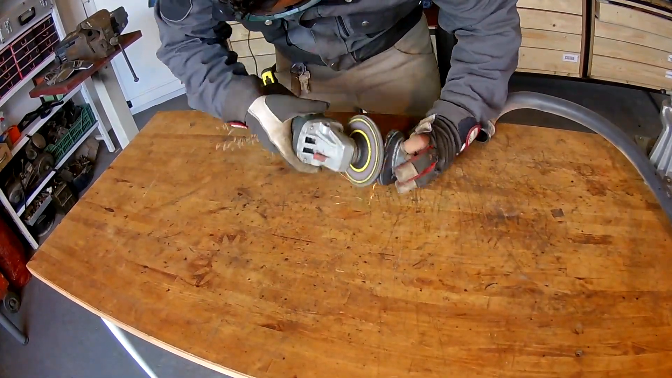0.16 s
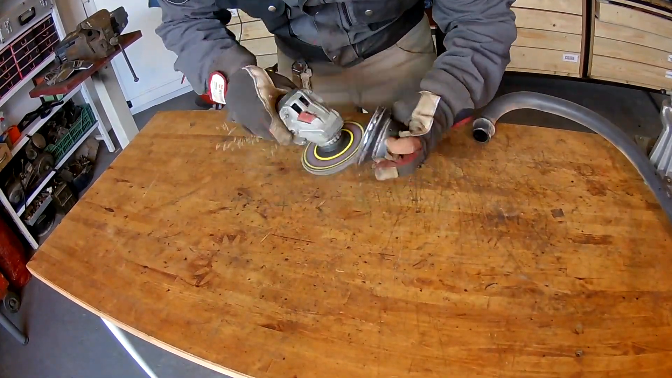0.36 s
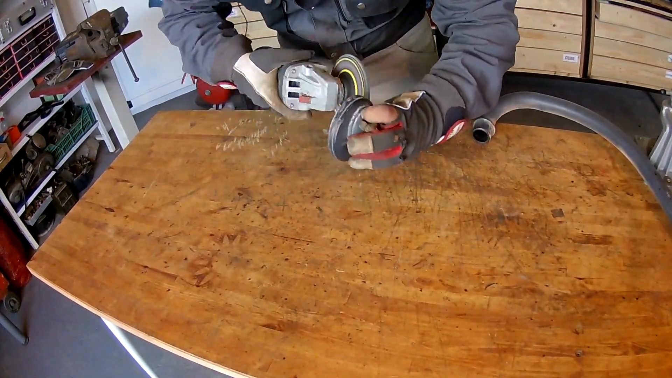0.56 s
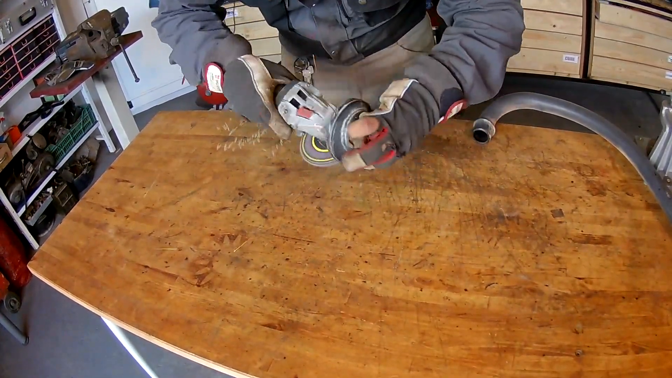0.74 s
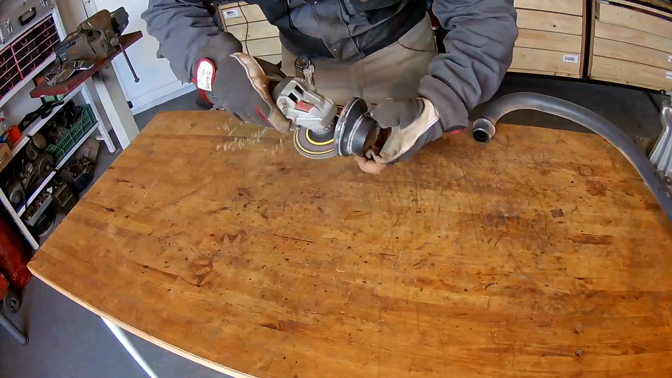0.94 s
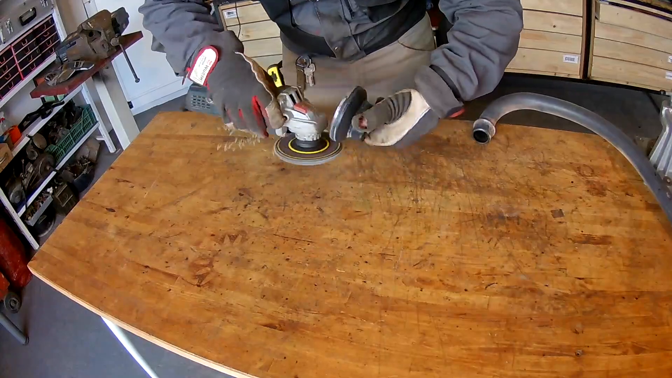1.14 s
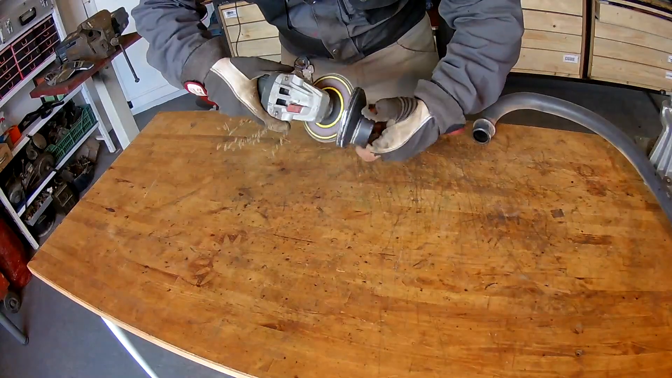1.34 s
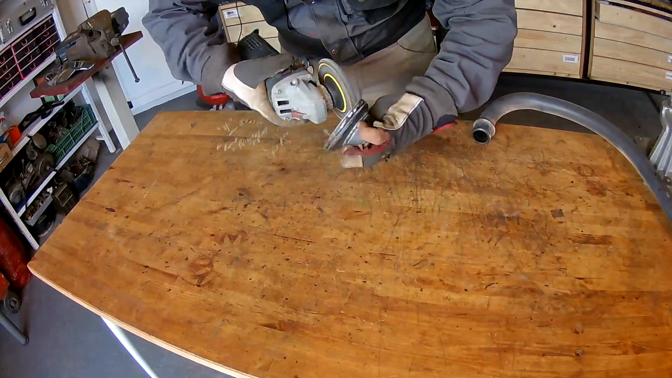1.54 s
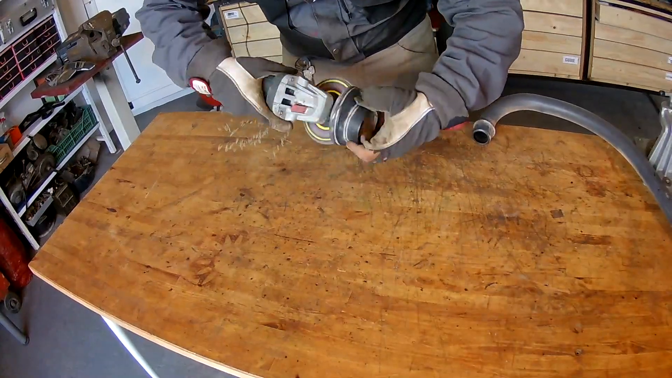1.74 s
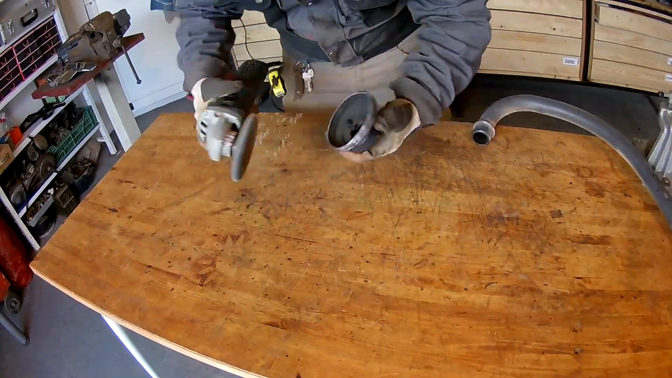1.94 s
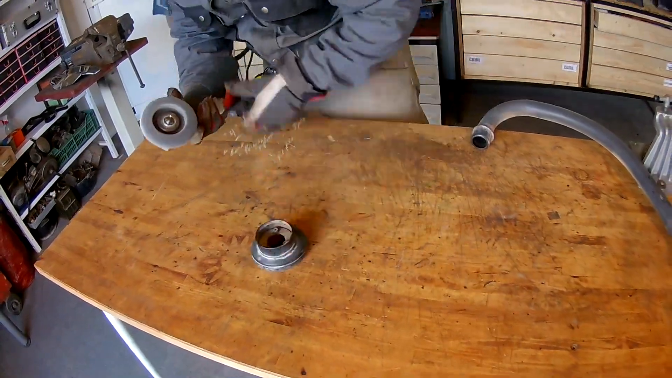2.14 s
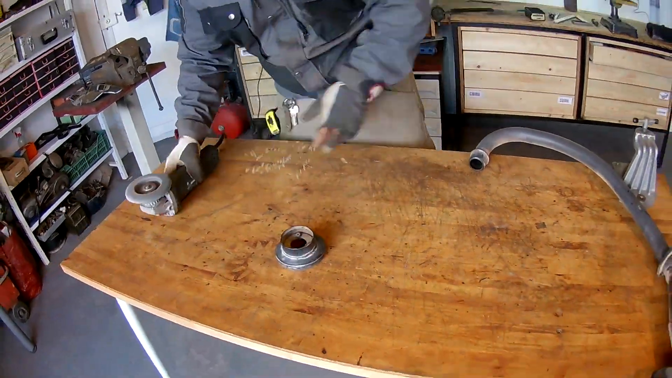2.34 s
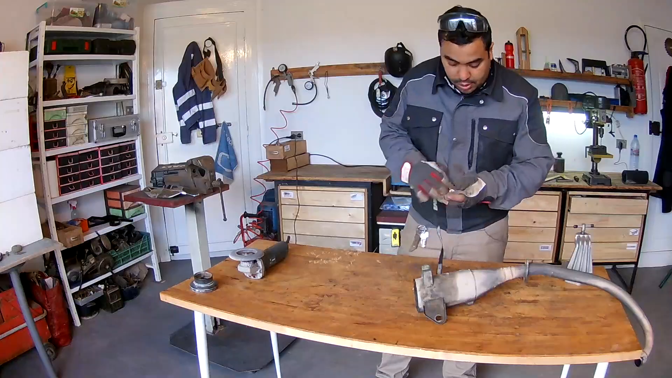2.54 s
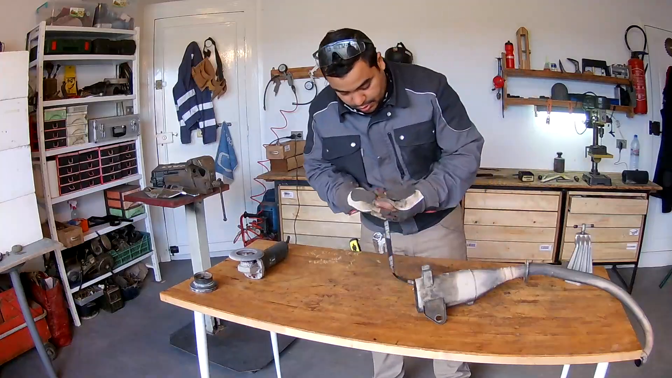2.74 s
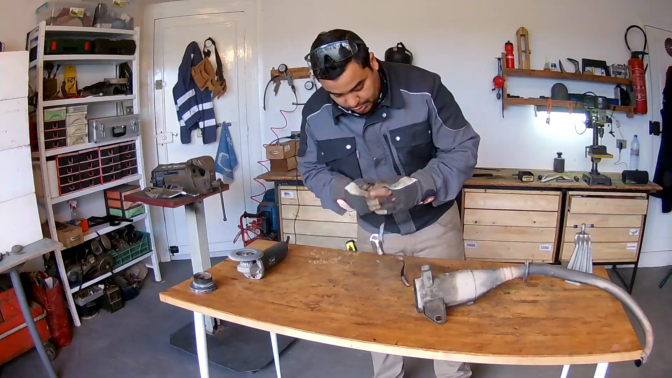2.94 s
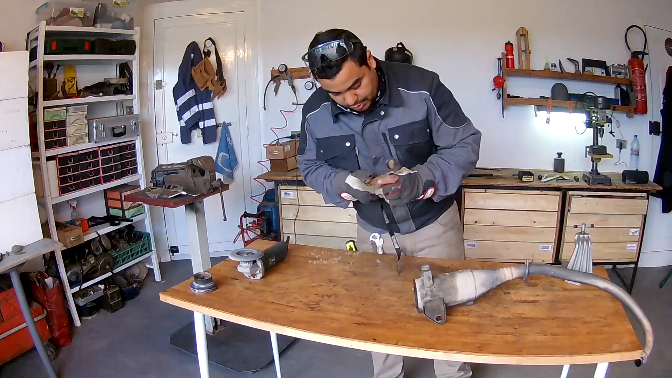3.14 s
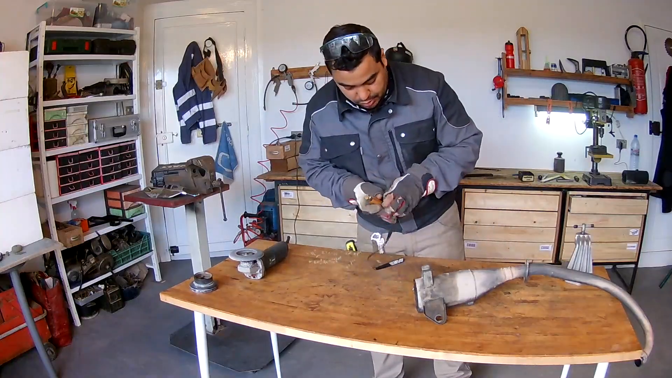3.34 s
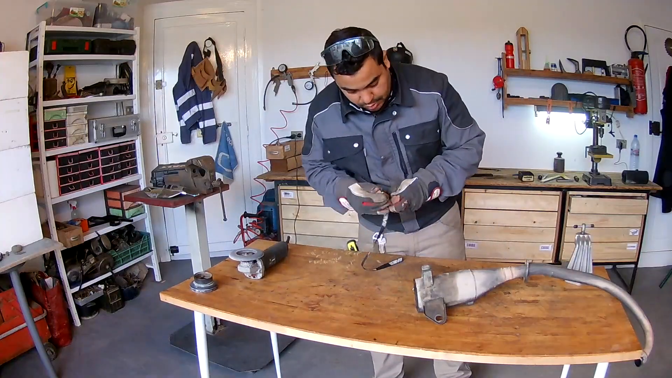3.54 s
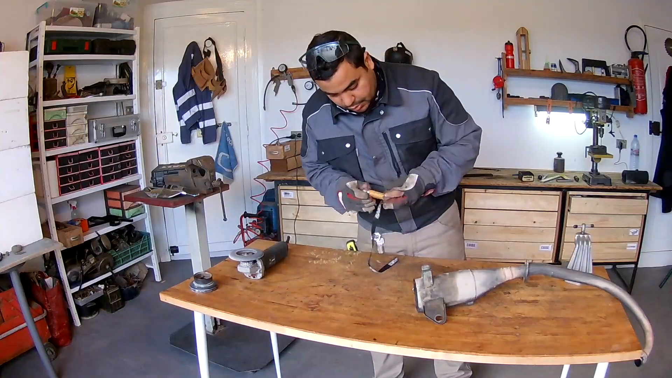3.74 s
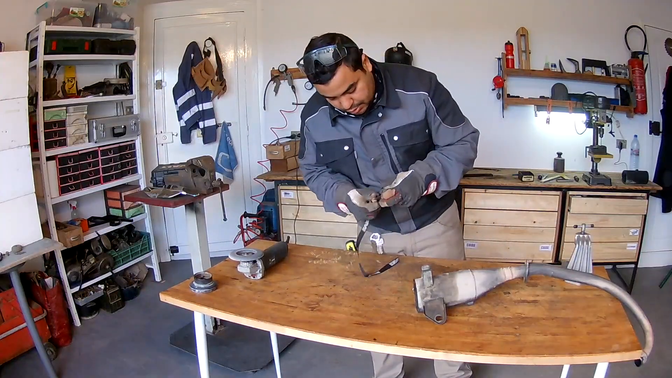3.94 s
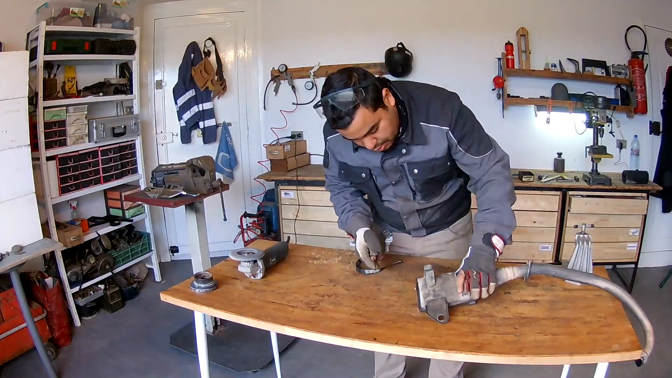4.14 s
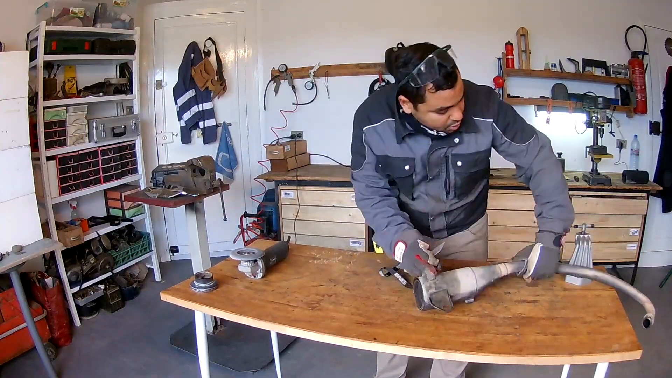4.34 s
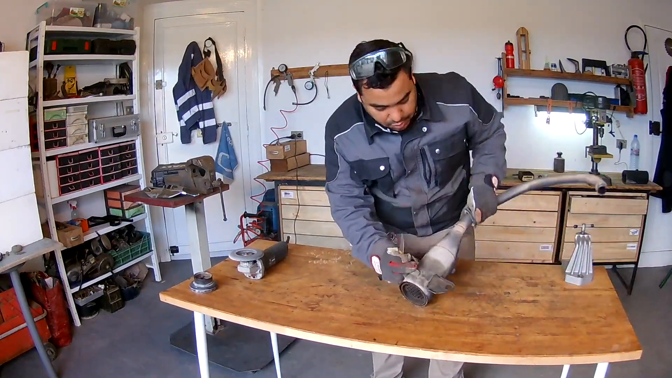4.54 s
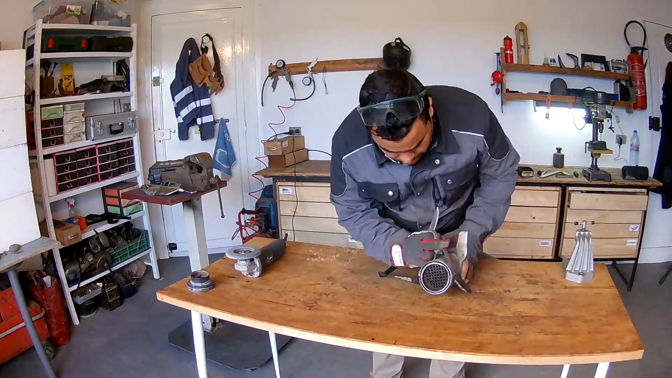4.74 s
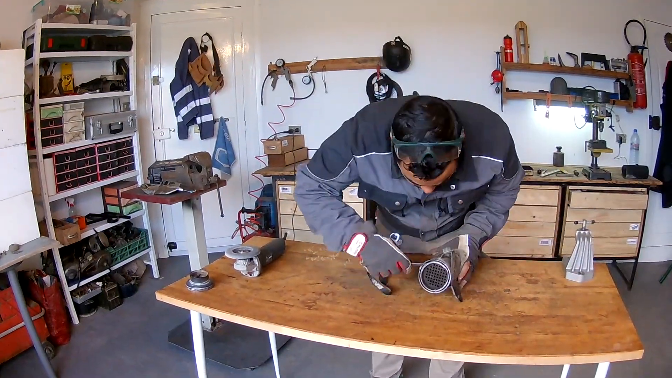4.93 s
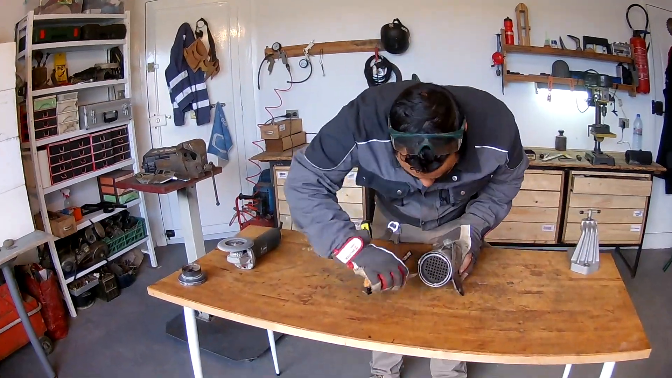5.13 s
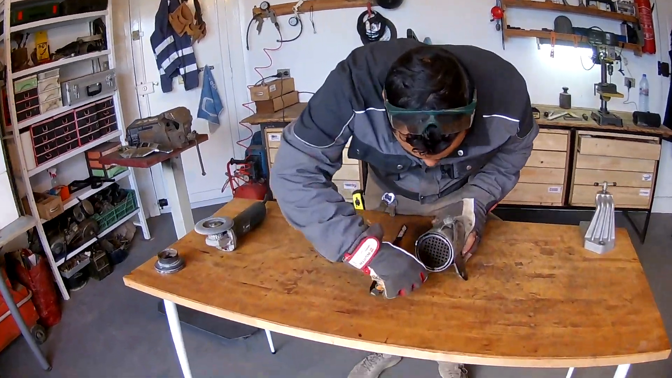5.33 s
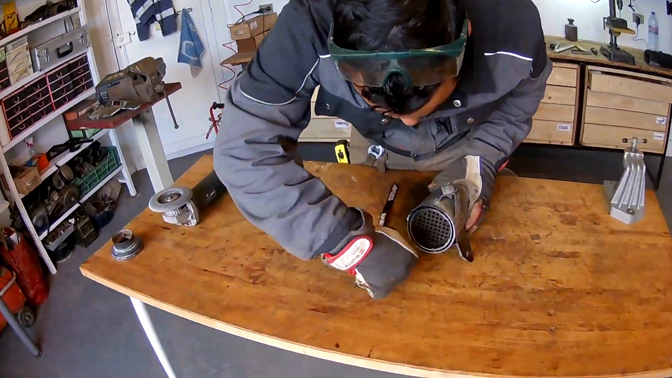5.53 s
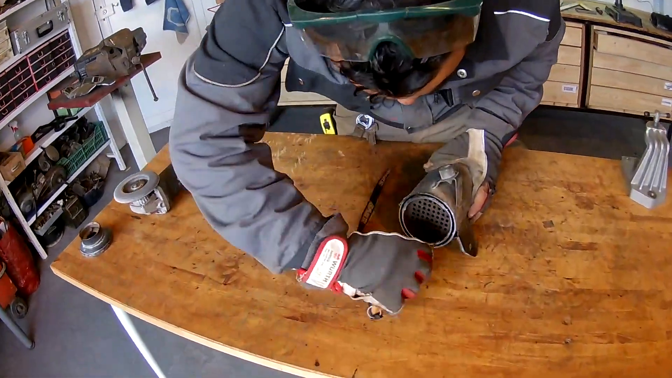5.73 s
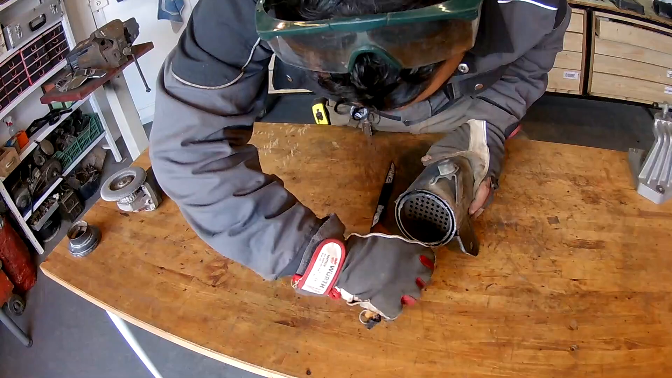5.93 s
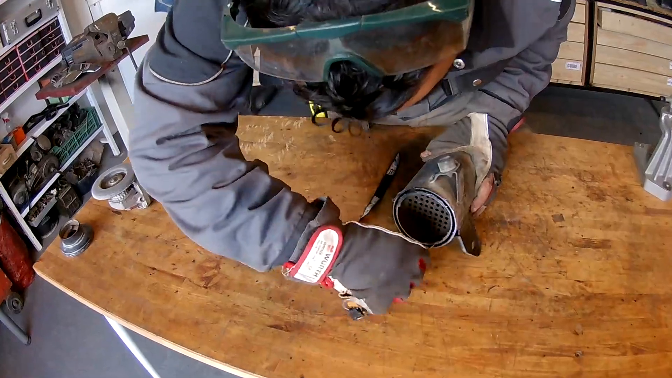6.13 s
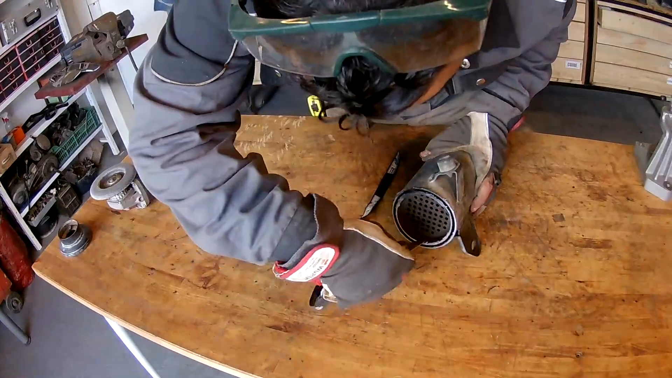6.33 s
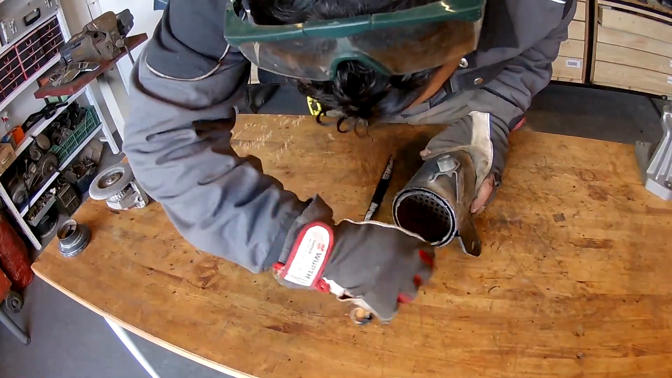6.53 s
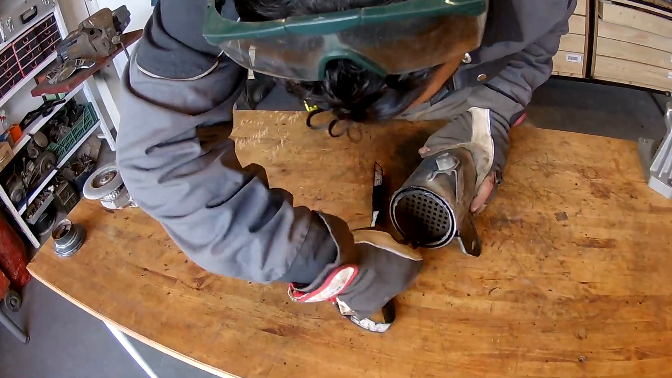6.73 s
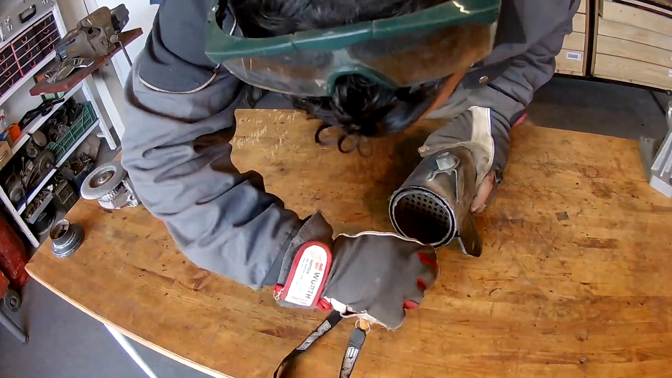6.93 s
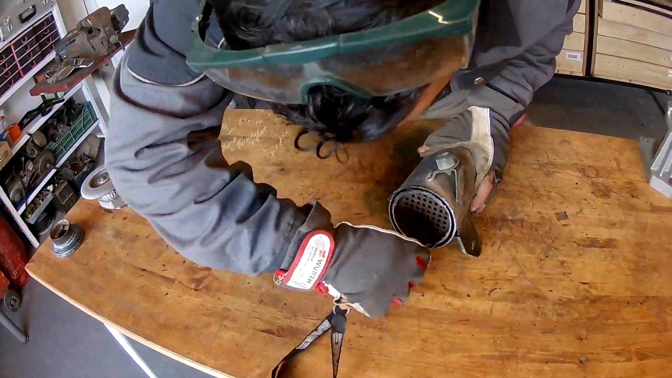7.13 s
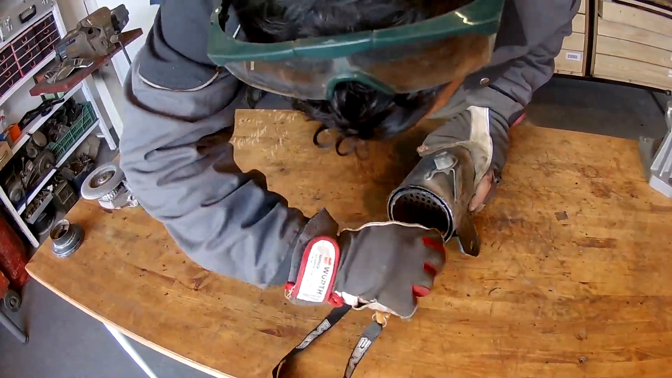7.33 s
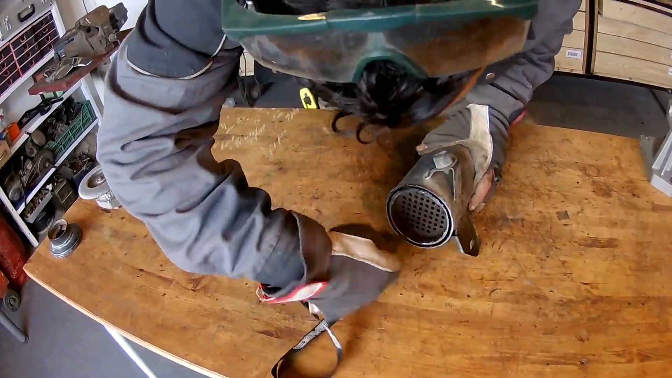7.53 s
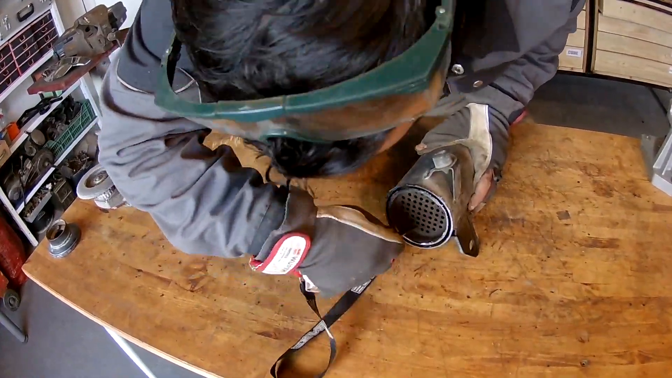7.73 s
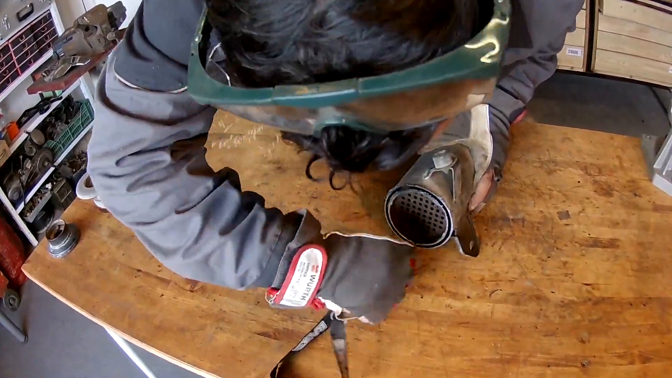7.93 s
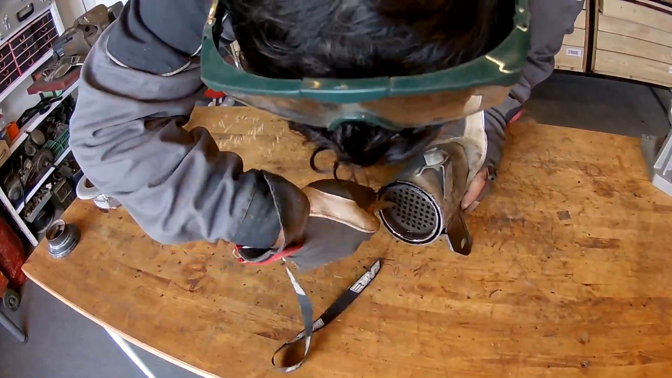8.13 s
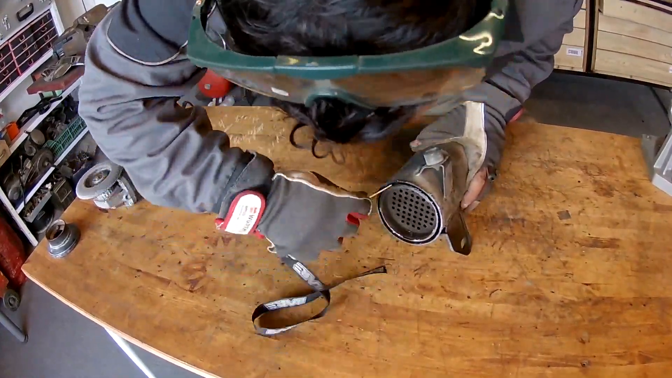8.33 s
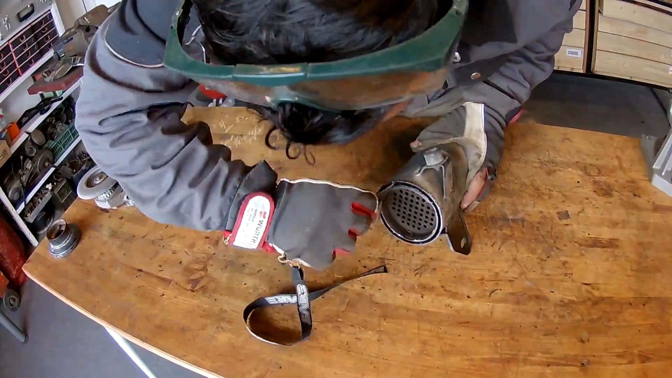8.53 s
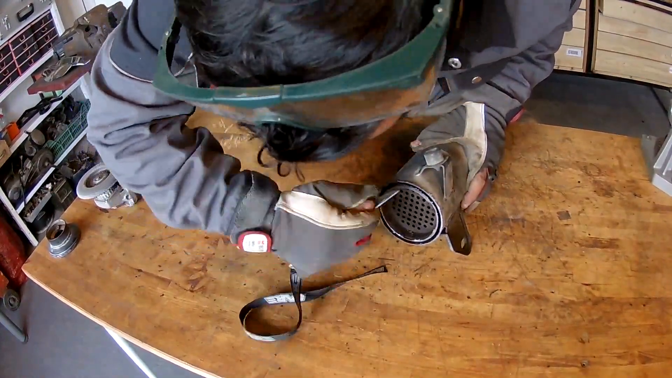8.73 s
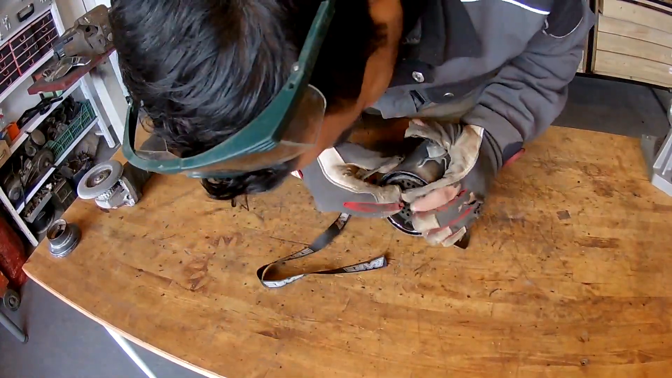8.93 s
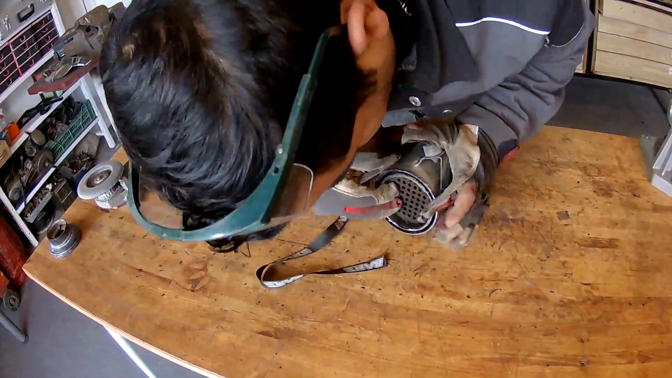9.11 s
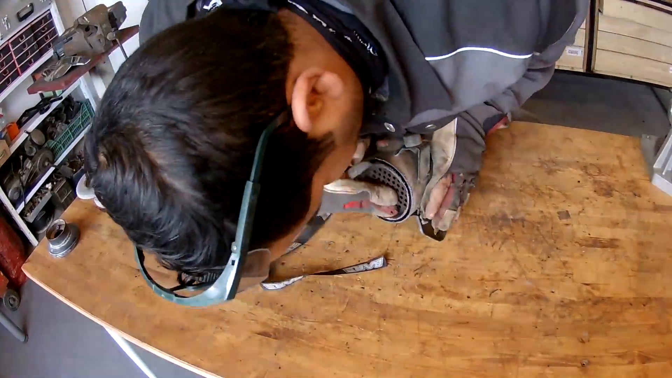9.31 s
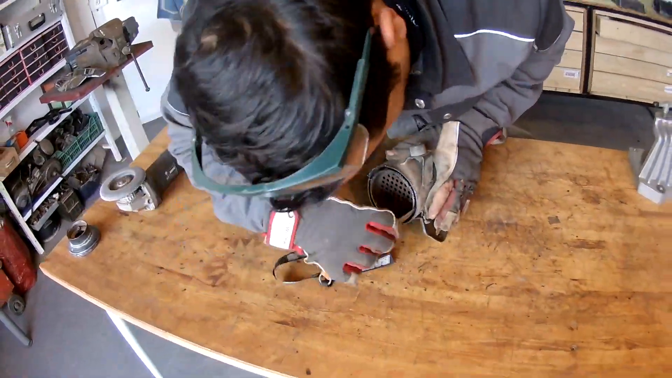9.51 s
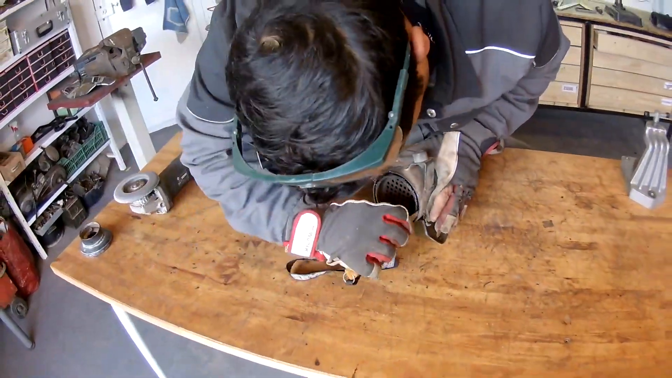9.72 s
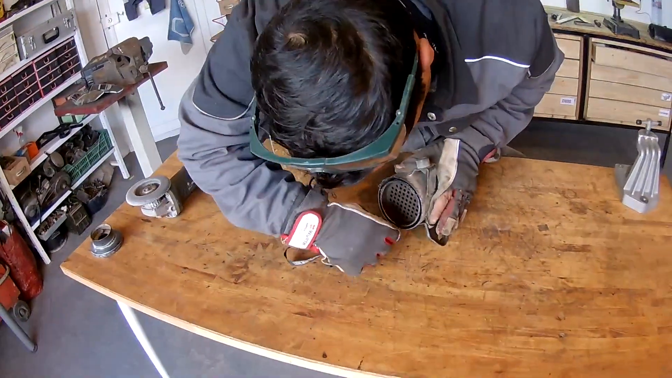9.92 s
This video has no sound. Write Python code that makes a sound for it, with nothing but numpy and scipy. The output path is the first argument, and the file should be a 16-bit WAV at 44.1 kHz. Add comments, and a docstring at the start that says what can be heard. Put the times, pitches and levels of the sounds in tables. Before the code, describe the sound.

From 0 to about 1.95 s a hand-held angle grinder works steel close by: dense, bright gritty hiss with a high whine that dips and sings at each press, including a longer press from 1.35 s. Switched off, its whine slides down while the tool clunks onto a wooden bench around 2.15 and 2.4 s. At 2.49 s the coasting sound cuts abruptly to a quiet workshop with soft air hiss, low rumble and hum. A distant engine revs unsteadily until about 4.3 s, with faint squeaks and small metallic ticks. From 4.2 s a hollow steel muffler is knocked and dragged, with strong clanks at 4.3 and 4.77 s. Sparser scrapes follow, then from 6 to 8.8 s busy rattling, knocks, bench thuds and thin bolt rings, hardest near 8.16 s. It thins after 9 s, ending with clanks near 9.85 s. Short room tail, identical channels.

```python
"""A hand-held angle grinder whines and hisses against steel, is switched off and laid on a wooden bench:
grit noise rings the disc, gear and armature tones fall together. At 2.49 s the sound cuts abruptly from
the coasting grinder to the quiet shop: over hiss, rumble and hum a distant engine revs (three harmonics).
From 4.2 s a hollow steel muffler is knocked, dragged and scraped: contact noise drives its modes and
the bench, while a loose bolt rings. Heard from close by, the same in both channels."""
import sys
import numpy as np
from scipy import signal
from scipy.fft import rfft, irfft
from scipy.io import wavfile
from scipy.ndimage import uniform_filter1d

SR = 44100
rng = np.random.default_rng(int(sys.argv[2]) if len(sys.argv) > 2 else 0)


def waveform_to_disk(signal):
    """Save audio, clipped to [-1, 1], as 16-bit WAV at the path in sys.argv[1]."""
    frames = np.transpose(np.atleast_2d(signal))
    scaled = np.clip(frames, -1, 1) * 32767
    samples = np.round(scaled).astype(np.int16)
    wavfile.write(sys.argv[1], SR, samples)


N = 439677
T = np.arange(N) / SR
CUT_S, HANDLING_START_S = 2.488, 4.1


def undb(db):
    """Decibels to gain."""
    return np.exp(np.asarray(db) * np.log(10) / 20)


def unit(x):
    """Scale to rms 1."""
    return x / np.sqrt(np.mean(x ** 2))


def curves(table):
    """Columns of a table joined by straight lines in time."""
    s, *columns = np.transpose(table)
    return [np.interp(T, s, c) for c in columns]


def walk(rate_hz):
    """Random levels joined by straight lines, rate_hz of them a second; spread near 1."""
    count = int(T[-1] * rate_hz) + 2
    return 1.2864 * np.interp(T * rate_hz, np.arange(count), rng.standard_normal(count))


def colour(x, points):
    """Give a noise the spectrum (hz, db); rms 1."""
    hz, db = np.transpose(points)
    f = np.arange(N // 2 + 1) * SR / N + 1
    gain = undb(np.interp(np.log(f), np.log(hz), db))
    return unit(irfft(rfft(x) * gain, N))


def band(x, lo_hz, hi_hz):
    """Band-pass that keeps the rms of white noise."""
    y = signal.sosfilt(signal.butter(2, [lo_hz, hi_hz], "band", fs=SR, output="sos"), x)
    return y * np.sqrt(SR / 2 / (hi_hz - lo_hz))


def highpass(x, hz):
    """Second-order high-pass."""
    return signal.sosfilt(signal.butter(2, hz, "high", fs=SR, output="sos"), x)


def ring(x, hz, width_hz):
    """One resonance, gain 1 at its centre."""
    return signal.lfilter(*signal.iirpeak(hz, hz / width_hz, SR), x)


def grains(spread_db):
    """Dense contact noise whose grains differ in size; rms 1."""
    size_db = spread_db * np.minimum(rng.exponential(size=N), 4)
    return unit(rng.standard_normal(N) * undb(size_db))


def tone(hz):
    """Sine of rms 1 on a moving pitch."""
    return np.sqrt(2) * np.sin(2 * np.pi * np.cumsum(hz) / SR)


def pings(table, t60_s, waver_rad):
    """Thin tones (start_s, pitch_hz, peak_db, length_s) that start at once, fade and are stopped."""
    out, wobble = np.zeros(N), waver_rad * walk(90)
    for start_s, hz, db, length_s in table:
        t = T[:int(length_s * SR)]
        edges = np.minimum(1, np.minimum(t / 0.00098, (length_s - t) / (0.31 * length_s)))
        sine = np.sin(2 * np.pi * hz * t + wobble[:len(t)])
        out[int(start_s * SR):][:len(t)] += edges * undb(db - 60 * t / t60_s) * sine
    return out


def room(x):
    """Add the short diffuse tail of a small cluttered workshop: decaying noise as impulse response."""
    t60_s, tail_db = 0.062, -7.5
    t = T[:int(.4 * SR)]
    tail = rng.standard_normal(len(t)) * undb(-60 * t / t60_s) * (t > .003)
    return x + undb(tail_db) * signal.fftconvolve(x, tail / np.linalg.norm(tail))[:N]


# air hiss spectrum: (freq_hz, density_db)
AIR_SPECTRUM = [(94, -36.5), (160, -22), (198, -7.5), (226, -26.5), (279, -1.5), (418, -14.5), (729, -10.5),
                (866, -14.5), (1030, -14.5), (1570, -16), (3940, -21), (4510, -23), (15700, -43)]


def air():
    """Steady coloured hiss that swells a little."""
    level_db, swell_db = -52.5, .6
    return undb(level_db + swell_db * walk(18.0)) * colour(grains(1.2), AIR_SPECTRUM)


# deep rumble: (time_s, level_db)
DEEP = [(0.0, -76), (2.89, -67.5), (6.13, -77), (6.36, -62), (7.13, -61), (9.33, -67), (9.97, -77.5)]
# bench top booms under some knocks: (start_s, drive_db)
BOOMS = [(6.035, -42), (6.749, -49), (6.881, -53.5), (7.07, -34), (7.528, -50), (7.656, -64), (8.163, -45),
         (8.253, -50), (9.003, -54), (9.242, -39)]


def rumble():
    """Deep noise, plus the bench top's low resonance driven by steady noise and by decaying bursts."""
    boom_t60_s, steady_drive_db = 0.17, -63.5
    deep_db = curves(DEEP)[0] + 2.3 * walk(2.5)
    deep = undb(deep_db) * band(rng.standard_normal(N), 30, 68)
    drive = undb(steady_drive_db + 1.0 * walk(5.7))
    for start_s, db in BOOMS:
        drive = drive + (T > start_s) * undb(db - 60 * np.maximum(T - start_s, 0) / boom_t60_s)
    return deep + ring(band(drive * rng.standard_normal(N), 102.5, 172), 135, 99)


# wavering hums: (pitch_hz, width_hz, level_db)
HUM = [(195.3, 5.2, -61), (262, 51, -60), (1190, 8, -65.5)]


def hums():
    """Noise through narrow resonances: hums that waver."""
    return sum(undb(db) * unit(ring(rng.standard_normal(N), hz, w)) for hz, w, db in HUM)


# distant engine: (time_s, fundamental_hz, third_harmonic_db)
ENGINE = [(2.5, 325, -71), (2.75, 334.5, -57), (2.95, 349.1, -59.5), (3.3, 357.5, -65), (3.5, 374.6, -60),
          (3.75, 380, -79), (3.9, 400, -57.5), (4.1, 400, -67), (4.25, 387, -74), (4.4, 385, -79.5)]


def engine():
    """Distant revving: third and fourth harmonics of an unsteady fundamental."""
    hz, third_db = curves(ENGINE)
    hz = hz * (1 + 0.01 * walk(40))
    harmonics = [(3, third_db), (4, third_db - 9.0)]
    out = sum(undb(db + 3.9 * walk(31)) * tone(k * hz) for k, db in harmonics)
    return out * (T > CUT_S)


# the distant engine's second harmonic, gliding up three times: (time_s, pitch_hz, level_db)
ENGINE_SECOND = [(2.8, 715, -75), (2.97, 810, -56), (3.03, 800, -80), (3.12, 730, -66), (3.4, 745, -61.5),
                 (3.55, 800, -63), (3.65, 740, -77.5), (3.9, 795, -59.5), (4.12, 806, -56),
                 (4.22, 770, -85)]


def engine_second():
    """The engine's second harmonic on its own curve: one gliding sine with flickering level."""
    hz, db = curves(ENGINE_SECOND)
    return undb(db + 2 * walk(31)) * tone(hz) * (T > CUT_S)


# faint wavering squeaks: (start_s, pitch_hz, peak_db, length_s)
SQUEAKS = [(2.53, 1950, -55, 0.085), (2.77, 2230, -55, .05), (3.02, 3940, -55.5, .06),
           (3.225, 3940, -52, 0.083)]


def squeaks():
    """Short tones with strong random phase wander."""
    return pings(SQUEAKS, 0.98, waver_rad=2.3)


# brief tones, low as the tool is jolted, then faint peeps: (start_s, pitch_hz, peak_db, length_s)
PEEPS = [(0.075, 591.8, -23, 0.066), (1.975, 531.4, -37, 0.093), (2.15, 283, -41, 0.21014),
         (2.94, 4145, -58, 0.054), (5.01, 3594, -48.5, 0.044), (5.09, 5530, -66, 0.24)]


def peeps():
    """Short, nearly steady tones."""
    return pings(PEEPS, 0.94, waver_rad=0.15)


# loose metal bits in the hands: (start_s, drive_db, t60_s)
TICKS = [(2.6754, -56, 0.0578), (3.1203, -59, 0.054), (3.4094, -65, 0.05467), (3.807, -48, 0.028),
         (4.032, -42, 0.043), (4.048, -39, 0.069), (4.141, -53.5, 0.035), (7.6, -35, .012),
         (7.699, -38, 0.013)]


def ticks():
    """Small bright ticks: decaying bursts of very uneven grains, band-passed high."""
    shape = sum((T > s) * undb(db - 60 * np.maximum(T - s, 0) / t60_s) for s, db, t60_s in TICKS)
    return band(shape * grains(15.0), 5651, 12300)


# loose bolt: (start_s, peak_db, length_s until a hand stops it)
BOLT = [(4.452, -67.5, .25), (4.87, -50, .55), (5.861, -45, .17), (6.04, -54, 0.11), (6.329, -57, .17),
        (6.607, -44.5, 0.18), (6.97, -57, 0.1), (7.07, -61.5, .4), (7.57, -46, 0.051), (8.125, -34, 0.054),
        (8.27, -59, .1), (8.389, -62, .2), (8.64, -51.5, 0.085)]


def bolt():
    """A loose bolt rings thinly at one pitch until stopped."""
    pitch_hz, t60_s = 6950, 1
    return pings([(s, pitch_hz, db, length_s) for s, db, length_s in BOLT], t60_s, waver_rad=.05)


def chatter(rate_hz, spread_db, fade_s, steady):
    """Contact force of rough steel: separate tiny knocks, each fading fast, over a steady rub; rms 1."""
    knocks = (rng.random(N) < rate_hz / SR) * undb(spread_db * rng.standard_normal(N))
    shape = signal.lfilter([1], [1, -np.exp(-1 / (fade_s * SR))], knocks)
    return unit((steady + shape) * grains(1.2))


# gloves rub faintly: drive_db for (low, clank, tick)
HANDLING_DB = [-58.5, -106, -86]
# drag and scrape strokes: (loudest_s, drive_db, swell_s, fade_s, clank_db, tick_db);
# swell_s and fade_s span 30 dB, at least 0.01 s each; clank_db and tick_db are relative to drive_db
STROKES = [(4.27, -44, 0.14, 0, 2, -25), (4.31, -29.5, 0.02, 0.24, 0, -29),
           (4.477, -33, 0.31, 0.09, -16, -16.5), (4.795, -18, 0.1048, 0.0671, -14, -28),
           (4.97, -41, 0.4, -0.4, -9, -22), (5.02, -47.5, 0.14, 0.22, -4, -6),
           (5.176, -30.5, -0.08, -0.03, 0, -11), (5.491, -26.5, 0.05, 0.13, -10, -21),
           (5.64, -22.5, 0.02, 0.0543, -7, -20.5), (5.93, -51, 0.2, 0.1, -5, -11.5),
           (6.255, -22.5, 0.0258, 0.06, -6.5, -19), (6.315, -30, 0.05, 0, -3, -16),
           (6.385, -49, 0.6, -0.46, -27, -23), (6.453, -38, 0.1, 0.1, -26, -19),
           (6.774, -21.5, 0.02, 0.06, -8.5, -32), (6.885, -26, -0.03, 0.04, -7, -19.5),
           (7.077, -26.5, 0.07, 0.05, 0, -6.5), (7.262, -22.5, 0.0958, 0.0442, -6, -16.5),
           (7.44, -37, -0.04, 0.13, -8, -15), (7.48, -24.5, 0.03, 0.03, -8.5, -12),
           (7.542, -27, 0, 0, -9, -13), (7.574, -21, 0.08, 0.065, -25, -22),
           (7.662, -20.5, -0.02, 0.12, -53, -16.5), (7.938, -33.5, 0.05, 0.04, -17, -15),
           (7.988, -32, 0.03, 0.1, -20, -25), (8.174, -18.5, 0.03, 0.0141, -16, -11),
           (8.266, -34.5, 0.37, 0, -25, -21), (8.428, -31.5, 0, 0.08, -10, -21),
           (8.52, -41, 0.33, 0.18, -15, -13.5), (8.644, -27.5, -0.02, 0.11, -5, -18),
           (8.668, -33.5, 0.02, 0.15, -12, -17), (8.685, -32, -0.15, 0.03, 7.5, -10),
           (8.763, -42, -1.9, 0.34, -14, -17), (8.798, -54, -1.5, 0.3, -9, -25),
           (9.0, -41, 0.07, 0.06, -14, -20), (9.254, -34, 0.13, 0.03, -7, -24),
           (9.415, -42, -0.03, 0.07, -37, -29), (9.55, -49, -0.4, 0.06, -8, -26),
           (9.77, -49, 0.1, -0.1, 0, -11), (9.889, -30.5, 0.03, 0, -12, -10)]


def scraping():
    """Envelopes (low, clank, tick) of drag strokes that swell and fade, over a faint rub, all unsteady."""
    drag = np.outer(undb(HANDLING_DB), T > HANDLING_START_S)
    for s, db, swell_s, fade_s, clank_db, tick_db in STROKES:
        swell_s, fade_s = max(swell_s, .01), max(fade_s, .01)
        a, b = int((s - 2 * swell_s) * SR), int((s + 2 * fade_s) * SR)
        t = T[a:b] - s
        fall_db = 30 * np.maximum(-t / swell_s, t / fade_s) ** 1.25
        drag[:, a:b] += np.outer(undb([0, clank_db, tick_db]), undb(db - fall_db))
    return drag * (T > HANDLING_START_S) * undb(1.76 * walk(50))


# knocks of tool and muffler on the bench: (start_s, strike_db, clank_db, tick_db, low_t60_s, ring_hz);
# strike_db is before the chatter and ring offsets, clank_db and tick_db are relative to it
BLOWS = [(0.077, -13.5, -35, -29, 0.073, 584), (2.148, -8.5, 4, -23.5, 0.07, 2496),
         (2.396, -3.5, -0.5, -36, 0.13, 1443), (2.43, -16.5, 6, -27, 0.083, 530),
         (2.479, -21, 10, -22, 0.036, 614), (4.242, -33, 1, -32, 0.098, 527.8),
         (4.301, -2, -5, -12.5, 0.1, 1534), (4.361, -13.5, 4, 3.5, 0.13, 3500),
         (4.383, -13, 10, -19, 0.068, 525), (4.448, -10, 1, -10, 0.15, 550),
         (4.709, -13.5, -8, -34, 0.067, 585), (4.767, 1, 5, -16, 0.11, 1484),
         (4.855, -10, -1.5, -11.5, 0.15, 537), (4.939, -20, -34, -32.5, 0.14, 576.7),
         (4.999, -33.5, -3, 3.5, 0.15, 776), (5.129, -34.5, -3, -14, 0.87, 835),
         (5.168, -30.5, -3, -3, 0.14, 2500), (5.254, -34.5, -25, -10, 0.15, 524),
         (5.414, -24.5, -3.5, -8.5, 0.12, 1540), (5.614, -28, 5, -1, 0.19, 620),
         (5.86, -25, -2, -4, 0.11, 1571), (5.887, -26.5, 7, -4.5, 0.088, 1580),
         (5.92, -25, -3, -3, 0.1, 1520), (6.004, -25, 1, -5, 0.29, 770), (6.037, -16, 8, 2.5, 0.056, 1330),
         (6.135, -43.5, -5, -6.5, 0.34, 2420), (6.197, -17.5, -3.5, -21, 0.64, 2350),
         (6.252, -14.5, -28, -30.5, 0.057, 680), (6.369, -30, -20, -6.5, 0.06117, 509),
         (6.485, -30.5, -4.5, -7, 0.25, 2380), (6.562, -25.5, 2, -2, 0.074, 2700),
         (6.605, -21, -2, -7.5, 0.15, 1290), (6.69, -19, -2, -14, 0.054, 493),
         (6.712, -12, -1.5, -23, 0.11, 1060), (6.747, -15, -3, -12, 0.16, 1240),
         (6.883, -12, -7, -7, 0.041, 535), (6.959, -35, 2, 1, 0.045, 1590),
         (6.974, -27, -3, -7, 0.13, 1550), (7.043, -25.5, -16, -25, 0.22, 750),
         (7.068, -10.5, 11.5, 5.5, 0.038, 560), (7.192, -22, -19, -44, 0.48, 2490),
         (7.242, -20, -19, -21, 0.1, 1570), (7.394, -34, -1, -8, 0.085, 1270),
         (7.422, -19, -40, -11, 0.14, 514), (7.459, -16, -3, -39, 0.16, 960),
         (7.513, -19, -10, -20, 0.073, 765), (7.524, -16.5, -31, -15, 0.15, 775),
         (7.637, -14, -22, -10.5, 0.14, 800), (7.658, -6.5, -32, -36, 0.066, 980),
         (7.71, -32.5, -13, -10, 0.039, 540), (7.784, -21.5, 1, -8, 0.045, 920),
         (7.911, -24.5, -7, -7, 0.095, 1570), (7.97, -17, -1.5, -32, 0.12, 950),
         (8.031, -25.5, 7, 2.5, 0.13, 738.6), (8.082, -13.5, -5.5, -15, 0.16, 940),
         (8.122, -16.5, -18, -1, 0.051, 800), (8.139, -11, -14, -9, 0.06, 720),
         (8.163, -1, -40, -16, 0.087, 1230), (8.254, -14, -22, -14, 0.048, 940),
         (8.262, -8, -33.5, -18, 0.077, 703), (8.384, -24.5, -1, -9, 0.13, 3550),
         (8.408, -15, -9.5, -19, 0.14, 1170), (8.428, -16.5, 5.5, 2, 0.045, 523),
         (8.479, -10.5, -19, -15, 0.049, 1600), (8.504, -16, -34, -14, 0.042, 1250),
         (8.57, -30.5, -31.5, -29, 0.11, 500), (8.622, -25, -25, -20, 0.08, 500),
         (8.634, -11, -0.5, -12.5, 0.046, 1950), (8.655, -17, -15, -17, 0.053, 1200),
         (8.684, -19.5, -2, -1, 0.059, 3660), (8.746, -23.5, -7, -5, 0.15, 940),
         (8.781, -13.5, -38, -12, 0.058, 1050), (9.008, -17.5, -3.5, -31, 0.077, 940),
         (9.223, -25, -9, -23, 0.41, 504), (9.376, -30.5, -32.5, -29, 0.11, 495),
         (9.472, -26, -18, -16, 0.035, 966), (9.481, -19, -45, -27.5, 0.043, 1310),
         (9.584, -28, 6.5, -1.5, 0.15, 1555), (9.697, -40, -2, 8, 0.047, 4900),
         (9.796, -22, 5.5, -27.5, 0.043, 2470), (9.834, -12.5, 2.5, -31, 0.11, 2400),
         (9.868, -15, -5, -15, 0.052, 784), (9.884, -14.5, 0, -16, 0.15, 780)]


def rattle(contact):
    """Envelopes (low, clank, tick) of decaying chatter, the first cracks, and each blow's loudest ring."""
    chatter_db, ring_db, crack_db, rise_s = -10, 11, 5, .001
    force, cracks, rings = np.zeros((3, N)), np.zeros((3, N)), np.zeros(N)
    for s, strike_db, clank_db, tick_db, t60_s, ring_hz in BLOWS:
        i = int(s * SR)
        t = T[:min(int(.25 * SR), N - i)]
        j = i + len(t)
        attack = np.minimum(t / rise_s, 1)
        # higher parts of the shell lose their energy sooner
        for k, (db, quick) in enumerate([(0, 1.0), (clank_db, 1.2), (tick_db, 1.5)]):
            force[k, i:j] += attack * undb(strike_db + db + chatter_db - 60 * quick * t / t60_s)
        cracks[:, i + 1] += undb(strike_db + chatter_db + crack_db + np.array([0, clank_db, tick_db]))
        burst = contact[i:j] * undb(strike_db + ring_db - 60 * t / t60_s)
        rings[i:j] += ring(burst, ring_hz, 61)
    return force, cracks, rings


def with_clack(force):
    """Insert a clack row between low and clank at the mean of their dB levels."""
    return np.insert(force, 1, np.sqrt(force[0] * force[1]), axis=0)


# muffler modes: (pitch_hz, width_hz, gain_db over the shell drive)
MUFFLER = [(530.5, 35.3, 16), (756, 93, 8.5), (833, 23, 8), (974, 34, 9), (1121, 25, 7.5), (1290, 52, 7),
           (1552, 16, 12), (1907, 18, 8.5), (2190, 17, 8), (2518, 60, 12), (2862, 79, 6.5), (3615, 40, 5.5),
           (3950, 35, 0), (4507, 60, 10.5), (5060, 70, 5.5), (5370, 30, 7.5), (6150, 68, 11.5),
           (6450, 92, 9.5), (8060, 80, 7.5), (10160, 86, 3.5)]
# shell noise bands: (low_hz, high_hz, force_row: 0 low, 1 clack, 2 clank, 3 tick)
SHELL = [(300, 1800, 0), (1800, 3300, 1), (3300, 5200, 2), (5200, 10500, 3), (10500, 15500, 3)]
# one gain_db per shell band
SHELL_DB = [-9.5, -12, -10.5, -5.5, -15.5]


def steel():
    """Contact excites shell, modes and bench; the contact point wanders, so mode shares change."""
    thud_db, wander_db, drag_ring_db = -40, 4, -1
    blow = grains(4.77)
    force, cracks, rings = rattle(blow)
    out = signal.sosfilt(signal.butter(2, [350, 5000], "band", fs=SR, output="sos"), rings)
    force, cracks, drag = with_clack(force), with_clack(cracks), with_clack(scraping())
    rub = drag * chatter(250, 4.0, 0.002, steady=.8)
    push = force * blow + cracks + rub
    ringing = force * blow + cracks + undb(drag_ring_db) * rub  # dragging damps the modes
    # wooden bench top under the steel
    out = out + undb(thud_db) * band(band(push[0], 147, 310), 147, 310)
    # neighbouring bands alternate in sign so that they add up where they meet
    for n, ((lo, hi, k), db) in enumerate(zip(SHELL, SHELL_DB)):
        part = undb(db) * push[k]
        for hz, width_hz, mode_db in MUFFLER:
            if lo <= hz < hi:
                part = part + ring(ringing[k] * undb(db + mode_db + wander_db * walk(12)), hz, width_hz)
        out = out + (-1) ** n * band(part, lo, hi)
    return out


# disc pressed on the work: (start_s, mesh_hz, level_db, held_s)
PRESSES = [(0.0, 2620, -26, 0.024), (0.12, 2606, -23.5, 0.016), (0.27, 2651, -25, 0.028),
           (0.37, 2585, -34, 0.028), (0.47, 2634, -29, 0.028), (0.55, 2602, -23, 0.022),
           (0.68, 2582, -25, 0.03), (0.75, 2624, -35, 0.014), (0.81, 2599, -26, 0.022),
           (0.92, 2582, -30, 0.021), (1.04, 2614, -24.5, 0.032), (1.19, 2608, -24.5, 0.01),
           (1.29, 2604, -30, 0.021), (1.345, 2588, -21.5, 0.56), (1.79, 2596, -26.5, 0.12)]
# falling whine after switch-off: (time_s, level_db)
COAST = [(1.96, -36), (1.985, -22), (2.005, -28), (2.025, -24), (2.05, -27), (2.07, -13), (2.087, -26),
         (2.12, -12), (2.17, -25), (2.24, -27.5), (2.28, -42), (2.39, -47)]


def gears():
    """Mesh pitch and level: each press slows and sings, then frees; after switch-off the motor coasts."""
    climb_hz_per_s, ease_db_per_s, free_hz, settle_s = 300, 35.5, 2668, 0.016
    off_s, coast_s = 1.952, 0.535  # speed falls to 37% in coast_s
    columns = np.transpose(PRESSES)
    latest = np.searchsorted(columns[0], T, "right") - 1
    start_s, low_hz, top_db, held_s = columns[:, latest]
    free_s = np.maximum(np.minimum(T, off_s) - start_s - held_s, 0)
    hz = uniform_filter1d(np.minimum(low_hz + climb_hz_per_s * free_s, free_hz), int(settle_s * SR))
    db = uniform_filter1d(top_db - ease_db_per_s * free_s, int(settle_s * SR))
    slowing = np.exp(-np.maximum(T - off_s, 0) / coast_s)
    return hz * slowing, np.where(T < off_s, db, curves(COAST)[0])


# grit and fan: (time_s, level_db, roar_lift_db, sizzle_lift_db)
GRIND = [(0.0, -15, 5, 9), (0.03, -13, 1.5, 7.5), (1.96, -13.5, -0.5, 6), (2.23, -23, 3.5, 6.5),
         (2.385, -27, 2, 1), (2.42, -28, 12, 0), (2.49, -31, 15.5, 0)]
# grit spectrum: (freq_hz, density_db)
GRIND_COLOUR = [(71, -69.5), (120, -47), (221, -33.5), (283, -28), (408, -26), (577, -15.5), (639, -22.5),
                (980, -12), (2400, -6.5), (2560, -9), (2770, -6.5), (6020, 0), (9430, -3.5), (12000, -17),
                (15700, -16.5)]
# disc resonances: (pitch_hz, width_hz, gain_db)
DISC = [(2275, 130, -5.5), (4120, 210, -20.5), (5330, 36, -1), (5580, 28, -1), (5940, 97, -3.5),
        (6360, 46, -5), (7360, 240, -6), (9500, 56, -1.5)]


def grinder():
    """Grit hiss rings the disc; gear mesh and armature sing on top and fall together at switch-off."""
    armature_ratio, armature_db = .2265, -42
    hz, whine_db = gears()
    level_db, roar_db, sizzle_db = curves(GRIND)
    grit = colour(grains(0.54), GRIND_COLOUR)
    grit = grit + sum(undb(db + 1.4 * walk(8.93)) * ring(grit, f, w) for f, w, db in DISC)
    roar = signal.sosfilt(signal.butter(2, 2800, fs=SR, output="sos"), grit)
    sizzle = highpass(grit, 10500)
    # roar and sizzle lift or drop the two ends of the colour
    hiss = grit + (undb(roar_db + 1.0 * walk(25)) - 1) * roar
    hiss = hiss + (undb(sizzle_db + 1.3 * walk(24.86)) - 1) * sizzle
    mesh = undb(whine_db + 1.1 * walk(60)) * tone(hz * (1 + .002 * walk(70)))
    # the armature buzz needs current, so it dies as the speed drops
    armature = undb(armature_db + 0.52 * walk(29.9)) * (hz / hz[0]) ** 6 * tone(armature_ratio * hz)
    return undb(level_db + 0.43 * walk(40)) * hiss + mesh + armature


def scene():
    """Sum all sources; at CUT_S the sound cuts from the coasting grinder to the quiet shop."""
    shop = air() + rumble() + hums() + engine() + engine_second()
    small = room(ticks() + peeps() + squeaks()) + bolt()
    knocks = room(steel()) * ((T < CUT_S) | (T > HANDLING_START_S))
    knocks = highpass(knocks, 170)  # thins their deep bass
    mono = shop + small + knocks + grinder() * (T < CUT_S)
    return np.array([mono, mono])


def record(dry):
    """Round the loudest peaks (tanh) and cut the top steeply."""
    top_hz = 15750
    rounded = np.tanh(.75 * dry) / .75
    return signal.sosfilt(signal.ellip(10, .2, 60, top_hz, fs=SR, output="sos"), rounded)


dry = scene()
out = record(dry)
waveform_to_disk(out)
```